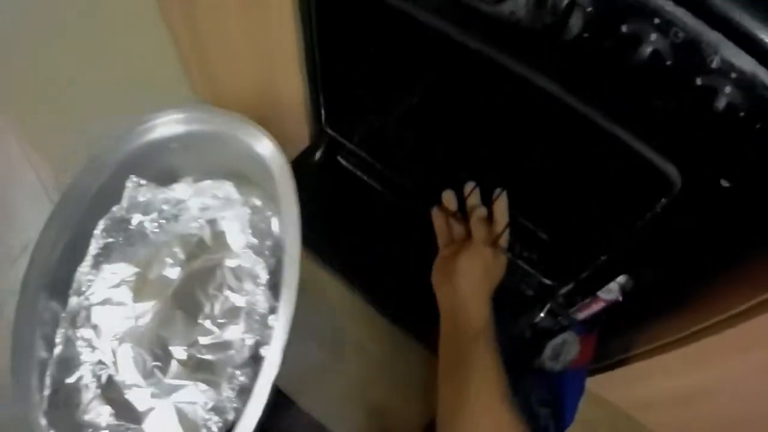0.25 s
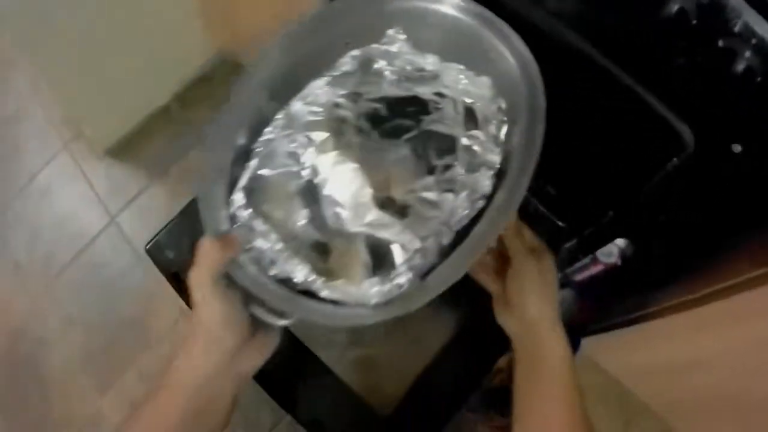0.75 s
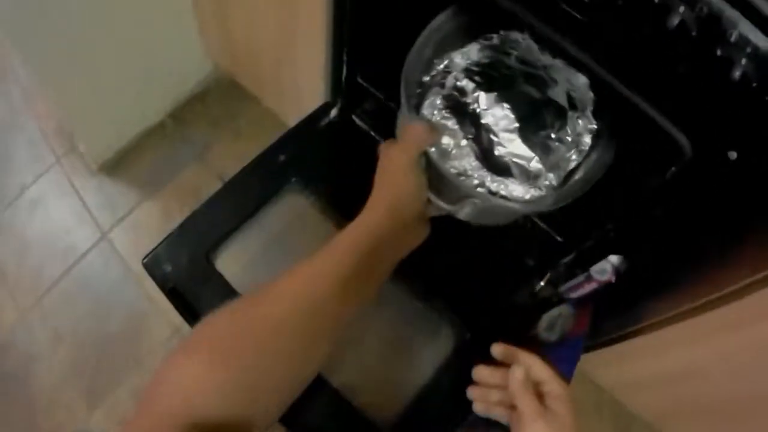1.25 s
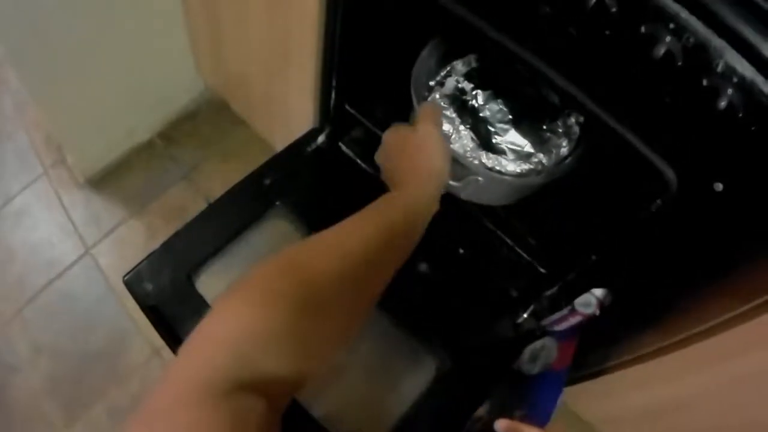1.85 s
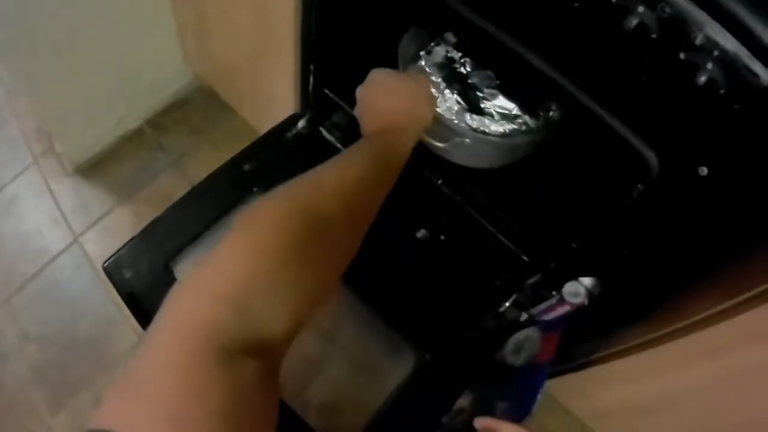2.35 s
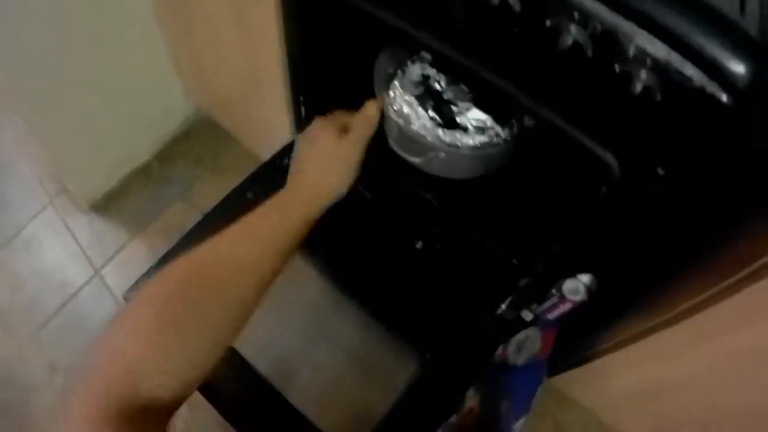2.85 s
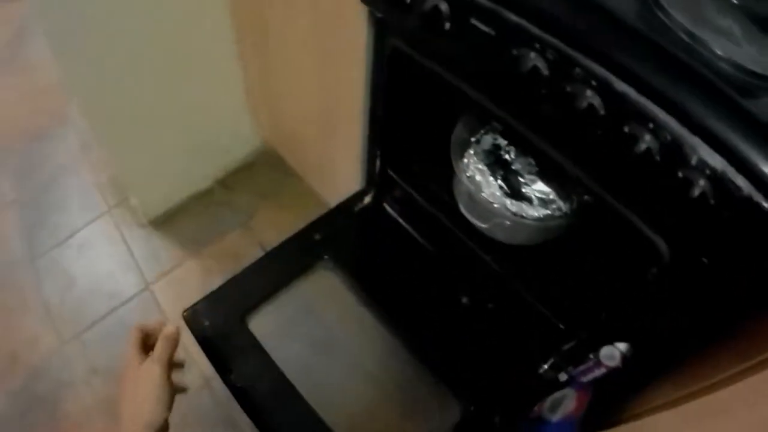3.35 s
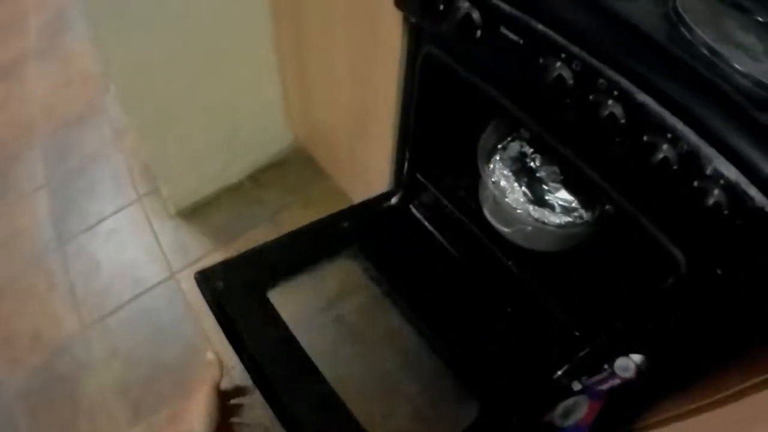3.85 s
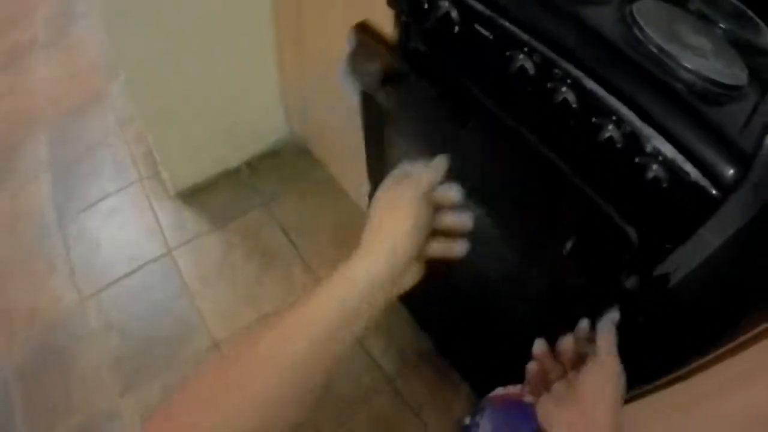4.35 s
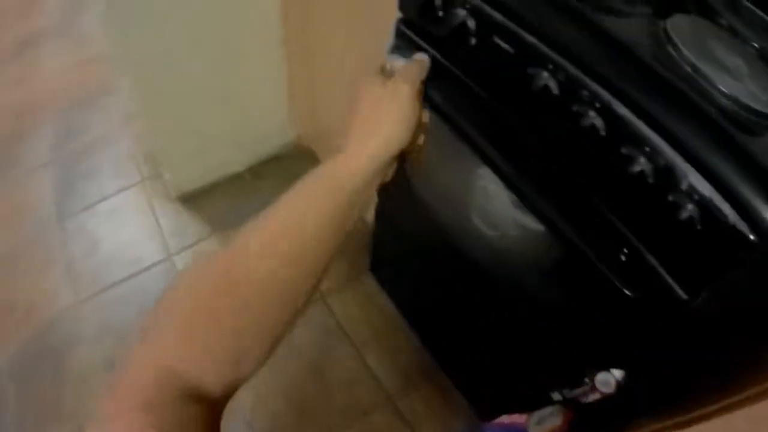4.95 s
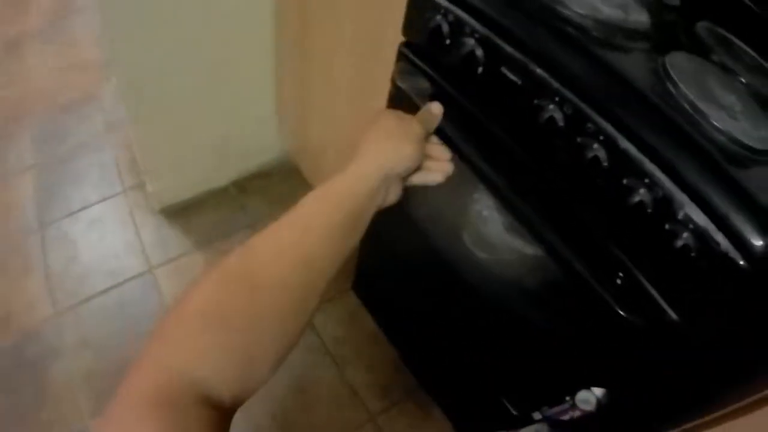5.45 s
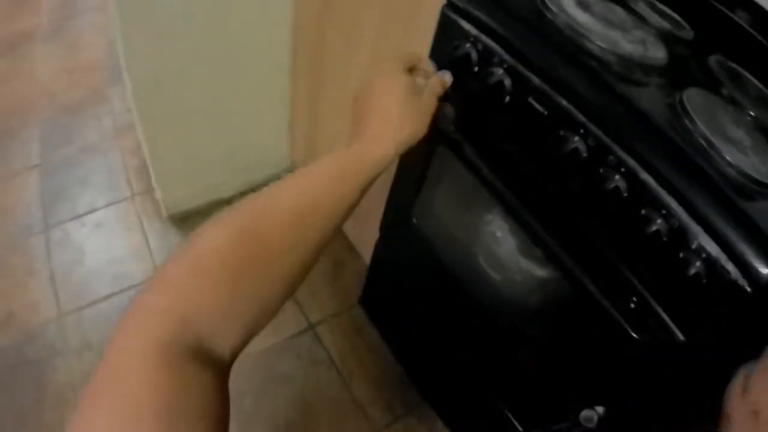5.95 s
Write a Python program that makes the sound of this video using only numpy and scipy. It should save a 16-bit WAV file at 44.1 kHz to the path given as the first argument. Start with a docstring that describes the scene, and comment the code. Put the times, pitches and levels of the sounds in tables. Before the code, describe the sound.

Close to an oven in a quiet tiled kitchen, a few quick metallic knocks come from the wire rack. A foil-lined roasting dish then lands on it and scrapes inward with ringing clanks and a faint fizz of foil. High, wavering hinge squeaks lead into a loud door slam that briefly overloads the small microphone. Light knocks and rattles follow, fading into a faint hum and hiss.

```python
"""A tiled kitchen, close to the oven, on a small housed microphone; faint hum and hiss lie underneath.
First the wire rack is knocked and slides with a low rumble. From 1.5 s a metal roasting dish is set on it
and pushed in, its foil lining fizzing. Blows ring the metal and leave noisy tails; sliding metal rattles.
Around 4 s the door hinge squeaks by stick-slip. At 4.5 s the door slams and overloads the microphone,
and a few small knocks and rattles die away."""
import sys
import numpy as np
from scipy import signal
from scipy.io import wavfile
from scipy.ndimage import uniform_filter1d

SR = 44100
rng = np.random.default_rng(int(sys.argv[2]) if len(sys.argv) > 2 else 0)


def generate_wav(signal):
    """Clip the signal to [-1, 1] and save it as 16-bit WAV at the path in sys.argv[1]."""
    frames = np.transpose(np.atleast_2d(signal))
    scaled = np.clip(frames, -1, 1) * 32767
    pcm = np.round(scaled).astype(np.int16)
    wavfile.write(sys.argv[1], SR, pcm)


N = 273464

# Blows on each object: (time [s], clatter level [dB], brightness [dB/octave], ring over clatter [dB],
# favoured pitch [Hz], its boost [dB], ring length [factor on the modes' t60])
RACK_BLOWS = [(0, -23.5, 4.5, -4.5, 666, 15.5, 0.27), (.042, -25.5, 0.5, -4, 147.5, 6, 2.1),
              (.098, -32, -3, -2, 1450, 20, 0.13), (0.2366, -24.5, -2.5, -6, 676, 9.5, 0.87),
              (0.271, -27, -4.5, -2.5, 146, -8, 0.61)]
DISH_BLOWS = [(1.541, -34.5, 4.5, -7.5, 1130, 1.8, 0.81), (1.545, -45, .3, 12.5, 600, 3, .9),
              (2.101, -48, 10.5, 3, 1120, 18.3, 0.32), (2.194, -28, 0.5, 0.5, 400, 12, 0.24),
              (2.261, -44, 4.5, 3.5, 410, 20, 1.5), (2.3445, -29, 1, -5, 550, 19.8, 0.18),
              (2.46, -58, -5.5, 5.5, 1490, 15, 1.7), (2.8529, -51, 6.5, -12.5, 4260, 4.1, 0.33),
              (2.915, -43.5, 5.5, -4, 606, 5.5, 0.37), (2.954, -45.5, 5, -17, 1800, 10, 0.29),
              (3.083, -49, 2.5, -13, 1580, 10, 1.6), (3.393, -53, 1.5, -18, 1390, 5.5, 1.2),
              (3.475, -42.5, 2, -0.5, 1000, 7, 0.089)]
DOOR_BLOWS = [(4.036, -38, 0.5, -1, 441, 11.6, 0.69), (4.5185, -9, 0.07, -4.5, 358, 2, .5),
              (4.954, -52.5, -1, -6, 1580, 3.3, .4), (5.043, -64.5, -4, 11, 540, 22, 0.69),
              (5.155, -58, 0.5, -21, 1636, 4.2, 0.37), (5.225, -64, -6, -4, 1112, 3.4, .27),
              (5.484, -64.5, -2, -10, 1506, 3, 0.27), (5.76, -67.5, -2.5, 5.5, 500, 3, .3),
              (6.165, -76.5, 1, -9, 1105, 7.3, .3)]
# Modes of each object: (frequency [Hz], level [dB], t60 [s])
RACK_MODES = [(142.5, -2, 0.27), (554, -6, 0.28), (698, 2, 0.081), (903, -4.5, .15), (1054, -14.5, 0.79),
              (1450, -1.5, 0.15), (2180, -8, 0.052), (3790, -15.5, 0.14)]
DISH_MODES = [(199, -10, .32), (394, -5, .35), (407, -5, .4), (470, -16, .15), (570, -16, .2),
              (641, -2, .36), (765, -15, .2), (878, -14, .2), (1071, -2, .19), (1222, -5, .21),
              (1345, -13, .35), (1650, -10, .2), (1720, -13, .35), (1868, -11, .4), (2681, -14, .15),
              (3850, -22, .2), (4200, -22, .12)]
DOOR_MODES = [(54, -7, .45), (113, -10, .35), (147, -7, .35), (250, -8, .3), (340, -1, .4), (424, -1, .38),
              (558, -7, .3), (648, -7, .4), (727, -7, .45), (854, -3, .35), (1084, -8, .4), (1222, -6, .35),
              (1357, -5, .35), (1585, -8, .3), (1752, -9, .95), (2632, -12, .15), (3838, -22, .35)]
# Colour of the clatter through the housed microphone, strong below 2 kHz, with a housing resonance
# near 4 kHz: (frequency [Hz], level [dB])
MIC_COLOUR = [(25, -34), (60, -14.5), (180, -9), (400, -3), (750, -3), (1140, -7.5), (1740, -7),
              (2300, -18.5), (3100, -23.5), (3900, -22), (4400, -26.5), (5200, -31), (7000, -37),
              (9500, -40.5), (14000, -47)]
PIVOT_HZ = 1000  # brightness tilts turn about this pitch


def amp(db):
    """Gain of a level in dB."""
    return 10 ** (np.asarray(db) / 20)


def unit_rms(x):
    """The signal scaled to an rms of one."""
    return x / np.sqrt(np.mean(x ** 2) + 1e-20)


def value_at(points, hz):
    """Reads (frequency, value) rows on a log-frequency axis."""
    f, value = np.transpose(points)
    return np.interp(np.log(hz + 1), np.log(f + 1), value)


def add(mix, start_s, sound):
    """Mixes a sound in at start_s."""
    part = mix[round(start_s * SR):][:len(sound)]
    part += sound[:len(part)]


def window(t, start, end, edge_s):
    """One between start and end, with soft edges inside."""
    return np.sin(np.pi / 2 * np.clip(np.minimum(t - start, end - t) / edge_s, 0, 1)) ** 2


def swells(rows):
    """Soft-edged gain over time from (start, end, level) rows."""
    return sum(amp(db) * window(np.arange(N) / SR, start, end, edge_s=0.08) for start, end, db in rows)


def wander(count, hz):
    """Smooth random drift of unit rms, up to about hz."""
    span = int(SR / hz)
    return unit_rms(uniform_filter1d(uniform_filter1d(rng.standard_normal(count), span), span))


def band_noise(hz, width_hz):
    """Noise in one resonance."""
    return unit_rms(signal.lfilter(*signal.iirpeak(hz, hz / width_hz, SR), rng.standard_normal(N)))


def coloured(x, spectrum, tilt_db=0):
    """Gives noise a spectrum and a tilt per octave, which may change over time."""
    hz, t, frames = signal.stft(x, SR, nperseg=512, noverlap=384)
    tilt = np.interp(t, np.arange(len(x)) / SR, tilt_db * np.ones(len(x)))
    octaves = np.log2(np.maximum(hz, 200) / PIVOT_HZ)[:, None]
    gain = amp(value_at(spectrum, hz)[:, None] + octaves * tilt)
    gain = gain / np.sqrt((gain ** 2).mean(0))
    return signal.istft(frames * gain, SR, nperseg=512, noverlap=384)[1][:len(x)]


def room_tone():
    """The quiet kitchen with its narrow hum, and the microphone's hiss."""
    # Spectrum of room and microphone noise: (frequency [Hz], level [dB])
    noise_spectrum = [(20, -15), (60, 2), (150, -6), (300, -12.5), (600, -13), (1500, -25), (3000, -29.5),
                      (6000, -33), (10000, -33.5), (14500, -33)]
    hiss = unit_rms(coloured(rng.standard_normal(N), noise_spectrum))
    hiss *= amp(-68 + 0.54 * wander(N, hz=13))
    hum = amp(-73.5) * band_noise(hz=283, width_hz=8.3)
    return hiss + hum


def kitchen_echo(x):
    """Reflections off the tiles: sparse taps of random sign, each band dying at its own speed."""
    # Reverberation of the kitchen: (frequency [Hz], t60 [s])
    decay_times = [(100, 0.5), (300, 0.49), (1000, 0.44), (3000, 0.61), (10000, 0.9)]
    taps, slots = np.zeros(SR), np.arange(200, SR - 20, 20)
    signs = rng.choice([-1., 1.], len(slots))
    taps[slots + rng.integers(0, 20, len(slots))] = signs
    hz, t, frames = signal.stft(taps, SR, nperseg=256)
    decay = amp(-60 * t / value_at(decay_times, hz)[:, None])
    tail = signal.istft(frames * decay, SR, nperseg=256)[1]
    return signal.fftconvolve(x, tail / np.linalg.norm(tail))[:N]


def rack_rumble():
    """The rack rumbles in one low band as it slides, and again under the pushed dish."""
    # Movements of the rack: (start [s], end [s], level [dB])
    moves = [(.3, .72, -59.5), (1.82, 2.62, -56.5)]
    return swells(moves) * band_noise(hz=136, width_hz=55)


def foil_fizz(snaps_per_s=3200, above_hz=6500):
    """The crumpled foil lining gives off dense tiny snaps while the dish is jolted."""
    # Spells of fizzing: (start [s], end [s], level [dB])
    jolts = [(1.8, 2.18, -71.5), (2.2, 2.56, -66), (2.86, 3.02, -68)]
    snaps = rng.standard_normal(N) * (rng.random(N) < snaps_per_s / SR)
    snap_sound = rng.standard_normal(600) * np.exp(-np.arange(600) / 120)
    fizz = signal.oaconvolve(snaps, snap_sound)[:N]
    treble = signal.sosfilt(signal.butter(2, above_hz, "high", fs=SR, output="sos"), fizz)
    return swells(jolts) * unit_rms(treble)


def tails_and_slides():
    """Gain and brightness of the rattle: a noisy tail follows each blow, and sliding metal surges."""
    # Strokes of metal on metal: (start [s], end [s], first level [dB], last level [dB], tilt [dB/octave])
    slides = [(0, 0.273, -36, -39, 0.93), (.4, 0.704, -61, -64.5, 3.5), (1.28, 1.5, -80, -74, 1.5),
              (1.696, 2.19, -59, -51.5, 1.1), (2.849, 3.297, -61, -59.5, 2.75),
              (3.303, 3.577, -64, -63.5, 3.5), (3.914, 4.064, -71, -60, -0.3), (4.072, 4.485, -54, -53, 4),
              (4.916, 5.041, -53, -52.5, -2), (5.059, 5.16, -55.5, -57.5, 4),
              (5.207, 5.578, -64.5, -68, 1.7)]
    rise_s, fade_db_per_s = 0.038, 90
    drop_after_s, drop_db_per_s = 0.32, 186.5
    t, parts = np.arange(0, N, 32) / SR, []
    for events, tail_db in (RACK_BLOWS, -13), (DISH_BLOWS, -11), (DOOR_BLOWS, -9.5):
        for start, db, *_ in events:
            age = np.maximum(t - start, 0)
            fade_db = fade_db_per_s * age + drop_db_per_s * np.maximum(age - drop_after_s, 0)
            tilt_db = -1 + 11 * np.minimum(age, drop_after_s)  # the tail brightens as it fades
            parts.append((amp(db + tail_db - fade_db) * np.minimum(age / rise_s, 1), tilt_db))
    surge = amp(2.5 * wander(N, hz=18)[::32])
    for start, end, first_db, last_db, tilt_db in slides:
        level = amp(np.interp(t, [start, end], [first_db, last_db]))
        edges = window(t, start - 0.04, end + 0.04, edge_s=0.08)
        parts.append((level * edges * surge, tilt_db))
    power = sum(level ** 2 for level, _ in parts) + 1e-20
    tilt = sum(level ** 2 * tilt_db for level, tilt_db in parts) / power
    return [np.interp(np.arange(N) / SR, t, x) for x in (np.sqrt(power), tilt)]


def rattle(lumps_db=1.0, ring_db=-5, dish_from_s=1.1, door_from_s=3.8):
    """Lumpy noise of tails and slides, part of it ringing in the rack, the dish, then the door."""
    level, tilt = tails_and_slides()
    drive = unit_rms(rng.standard_normal(N) * amp(lumps_db * wander(N, hz=80)))
    moved = np.digitize(np.arange(N) / SR, [dish_from_s, door_from_s])
    t, ring = np.arange(SR // 4) / SR, np.zeros(N)
    for k, modes in enumerate((RACK_MODES, DISH_MODES, DOOR_MODES)):
        body = sum(amp(db - 60 * t / t60) * np.sin(2 * np.pi * hz * t) for hz, db, t60 in modes)
        ring += signal.oaconvolve(drive * (moved == k), body / np.linalg.norm(body))[:N]
    return level * unit_rms(coloured(drive, MIC_COLOUR, tilt) + amp(ring_db) * ring)


def hinge_squeaks(waver_hz=25, throb_db=3.8, third_harmonic_db=-33):
    """Stick-slip locks on one mode after another: wavering, throbbing tones with weak overtones."""
    # Squeaks: (start [s], end [s], first pitch [Hz], last pitch [Hz], level [dB], octave over tone [dB])
    squeaks = [(3.945, 4.0, 1290, 1300, -66, -30), (3.97, 4.04, 3100, 3250, -72, -30),
               (4.05, 4.08, 2500, 2640, -46, -8), (4.068, 4.097, 3780, 3850, -52, -14),
               (4.08, 4.17, 2310, 2190, -53, -20), (4.085, 4.15, 4600, 4660, -57, -20),
               (4.095, 4.15, 3440, 3400, -53, -10), (4.105, 4.19, 1205, 1240, -38, -30),
               (4.125, 4.168, 5430, 5470, -58, -25), (4.13, 4.205, 4255, 4320, -41, -24),
               (4.135, 4.185, 7380, 7340, -62, -30), (4.178, 4.295, 4030, 4075, -40, -24),
               (4.18, 4.295, 1240, 1225, -53, -25), (4.22, 4.275, 1970, 1975, -53, -25),
               (4.265, 4.355, 5030, 5065, -48.5, -21), (4.27, 4.36, 4150, 4200, -48, -21),
               (4.285, 4.46, 4060, 4100, -57, -25), (4.345, 4.516, 5030, 5050, -49, -13),
               (4.44, 4.512, 1905, 1925, -55, -25)]
    out = np.zeros(N)
    for start, end, first_hz, last_hz, db, octave_db in squeaks:
        count = int((end - start) * SR)
        waver = waver_hz * wander(SR // 4, hz=250)[:count]
        throb = throb_db * wander(SR // 4, hz=130)[:count]
        phase = 2 * np.pi * np.cumsum(np.linspace(first_hz, last_hz, count) + waver) / SR
        overtones = amp(octave_db) * np.sin(2 * phase) + amp(third_harmonic_db) * np.sin(3 * phase)
        edges = window(np.arange(count) / SR, 0, end - start, edge_s=0.016)
        add(out, start, amp(db + throb) * (np.sin(phase) + overtones) * edges)
    return out


def blows(events, modes, clatter_t60_s, spot_octaves):
    """Each blow is a burst of clatter plus the object's modes; the struck spot favours one pitch region."""
    graze_s, graze_db = 0.0036, -22.5  # a light touch just ahead of each blow
    rise_s, blunt_hz, blunt_db = 0.0007, 8000, 10
    out, t = np.zeros(N), np.arange(SR * 2 // 3) / SR
    mode_hz, mode_db, mode_t60 = np.transpose(modes)
    band_hz, band_db = np.transpose(MIC_COLOUR)
    band_db = band_db - blunt_db * (band_hz > blunt_hz)  # contact time dulls the top
    attack = 1 - np.exp(-t / rise_s)
    for start, db, tilt_db, ring_db, spot_hz, spot_db, ring_length in events:
        favour_db = lambda hz: spot_db * np.exp(-(np.log2(hz / spot_hz) / spot_octaves) ** 2)
        scatter_db = rng.standard_normal(len(modes))
        sign = rng.choice([-1, 1], len(modes))
        struck_db = mode_db + scatter_db + favour_db(mode_hz) + tilt_db * np.log2(mode_hz / PIVOT_HZ)
        fade_db = 60 * t[:, None] / (ring_length * mode_t60)
        ring = (sign * amp(struck_db - fade_db) * np.sin(2 * np.pi * mode_hz * t[:, None])).sum(1)
        ring /= np.sqrt(np.mean(ring[:800] ** 2))  # unit rms over the first 18 ms
        spectrum = np.transpose([band_hz, band_db + favour_db(band_hz)])
        clatter = coloured(rng.standard_normal(len(t)), spectrum, tilt_db) * amp(-60 * t / clatter_t60_s)
        add(out, max(start - graze_s, 0), amp(db + graze_db) * clatter)
        add(out, start, amp(db) * (clatter + amp(ring_db) * ring) * attack)
    return out


def scene():
    """Close to the oven: blows and squeaks echo in the kitchen over the rattle and the room tone."""
    rack = blows(RACK_BLOWS, RACK_MODES, clatter_t60_s=0.11, spot_octaves=0.82)
    dish = blows(DISH_BLOWS, DISH_MODES, clatter_t60_s=0.2, spot_octaves=0.6)
    door = blows(DOOR_BLOWS, DOOR_MODES, clatter_t60_s=0.21, spot_octaves=0.51)
    struck = rack + dish + door
    hinge = hinge_squeaks()
    echo = kitchen_echo(amp(-8) * struck + amp(-13) * hinge)
    return (struck + hinge + echo + rattle() + rack_rumble() + foil_fizz() + room_tone())[None]


def record(dry):
    """The small microphone clips on the slam and passes nothing much above 14.6 kHz."""
    clipped = np.clip(dry, -0.72, 0.72)
    lowpass = signal.firwin(511, 14600, window=("kaiser", 9), fs=SR)
    return signal.oaconvolve(clipped, lowpass[None], "same")


dry = scene()
out = record(dry)
generate_wav(out)
```